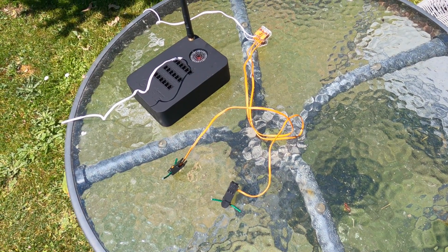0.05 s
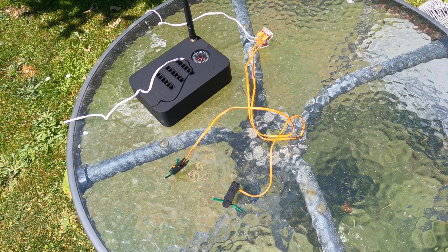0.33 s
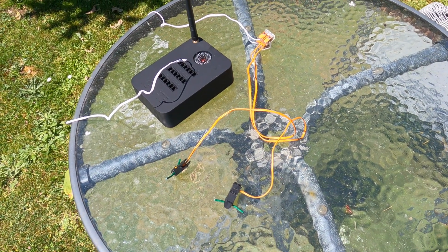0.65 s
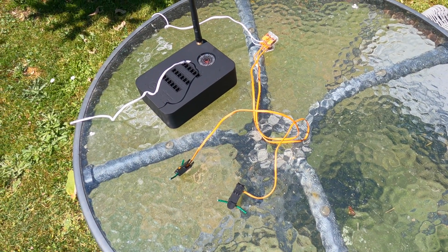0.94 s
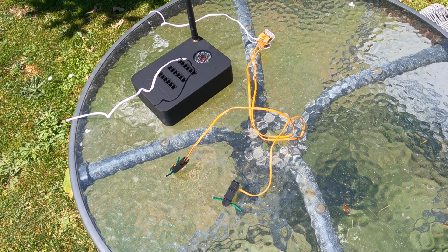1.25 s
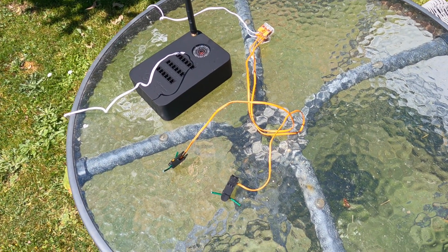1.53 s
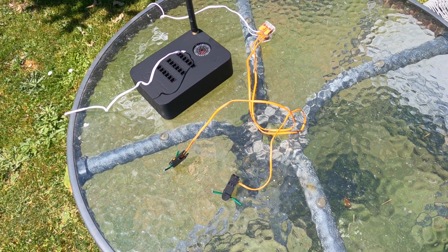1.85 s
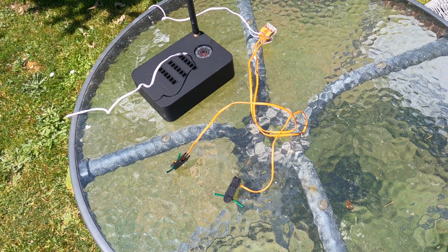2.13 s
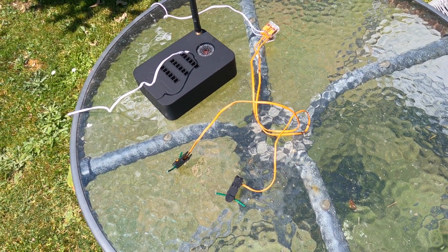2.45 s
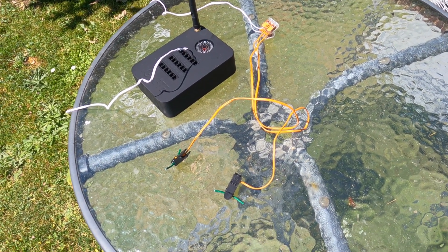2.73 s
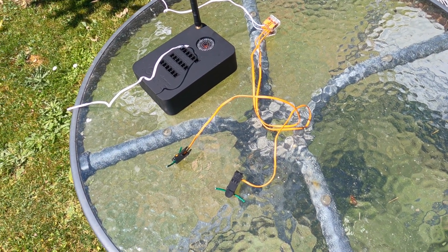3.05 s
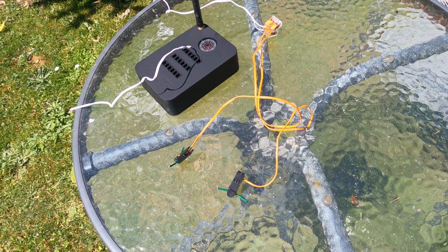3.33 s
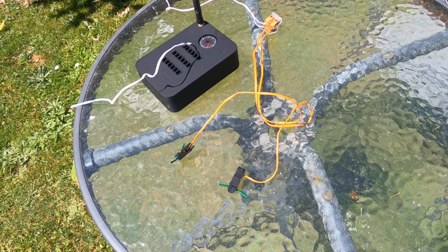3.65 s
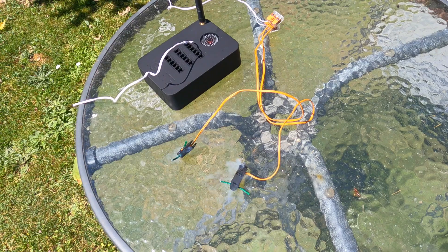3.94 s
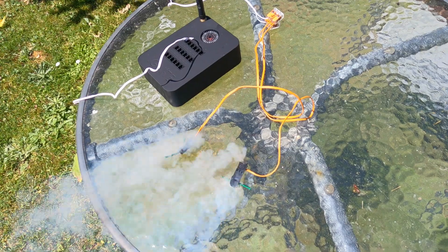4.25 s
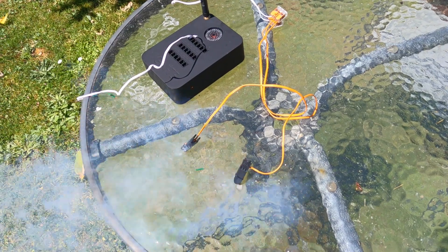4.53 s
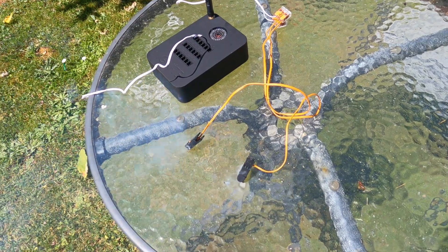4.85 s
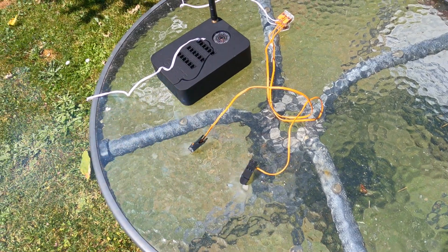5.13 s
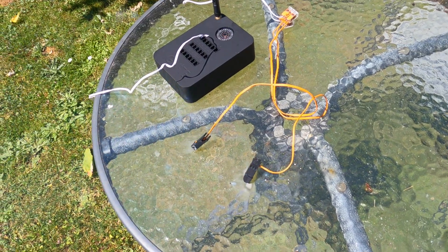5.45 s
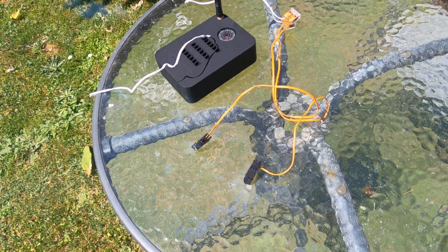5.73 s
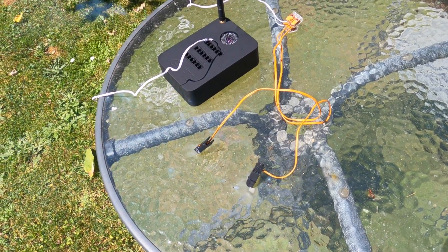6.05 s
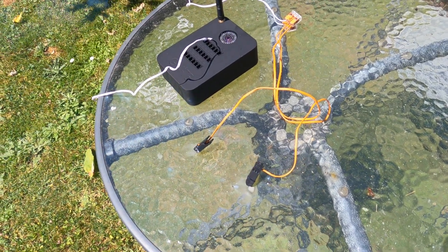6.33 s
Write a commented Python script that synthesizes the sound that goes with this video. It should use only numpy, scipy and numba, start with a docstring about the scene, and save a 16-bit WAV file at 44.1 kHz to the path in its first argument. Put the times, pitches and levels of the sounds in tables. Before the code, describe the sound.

Songbirds whistle and chatter in the trees over faint far traffic and a low machine hum. Close to the hand-held microphone, a small igniter bursts into a hissing jet, and a second joins it half a second later with a few short spits. They sputter, die down to a thin fizzing and stop abruptly about two seconds after lighting. Wind gusts buffet the microphone, and soft chirps return.

```python
"""Two firework igniters burn on a glass garden table, close to a hand-held phone.
Rushing gas and popping grains make the sound: the first flares into a hissing jet, the second joins
with a broader roar, then a thin fizz lingers and cuts out. Songbirds whistle, chirp and rattle in the
trees, with faint calls and rustles behind them. A breeze rumbles on the microphone over far traffic
and the hum of a distant machine."""
import sys
import numpy as np
from scipy import signal
from scipy.fft import rfft, irfft
from scipy.io import wavfile
from scipy.ndimage import uniform_filter1d
from numba import njit

SR = 44100
rng = np.random.default_rng(int(sys.argv[2]) if len(sys.argv) > 2 else 0)


def store_pcm(level_fs):
    """Save levels as 16-bit WAV."""
    pcm = np.round(np.clip(level_fs, -1, 1) * 32767).astype(np.int16)
    wavfile.write(sys.argv[1], SR, np.atleast_2d(pcm).T)


N = 290619
TIME = np.arange(N) / SR

# How the flame changes as it burns down. Each row: time in seconds, stage (0 flare, 1 blaze, 2 embers,
# 3 last fizz), left minus right in dB, stereo width in dB.
BURN_STAGES = [(4.36, 0, -1, -3), (4.6, 1, 0.5, -8.5), (4.84, 1, 1.5, -3), (4.95, 2.5, 3, -9),
               (5.3, 2.5, 3, -1), (5.5, 3, 2.5, 5)]
# How a small bird's windpipe and beak filter its voice. Each row: frequency in Hz, gain in dB.
BEAK_FILTER = [(1500, -14), (2400, -5), (3100, -0.5), (5000, -1.5), (6900, -5.5), (7700, -23), (9000, -18)]


def igniters(surge_db=0.9, glass_db=-12.5, garden_db=-21, top_side_db=-2, top_hz=12800):
    """The flames surge; the glass throws the hiss straight back and the garden echoes faintly."""
    # How much the hiss differs between the ears. Each row: frequency in Hz, gain in dB.
    spread = [(200, -13.5), (600, -11.5), (1200, -22), (1900, -21), (2400, -10), (3400, -9.5),
              (4200, -24.5), (6800, -21), (10500, -25.5)]
    _, pan_db, side_db = curves(BURN_STAGES)
    direct = flame() * undb(surge_db * walk(40)) + spits()
    glass_echo = undb(glass_db) * scatter(direct, t60=0.057, delay_s=.001)
    garden_echo = undb(garden_db) * scatter(direct, t60=0.35, delay_s=0.015)
    wide = flame()
    side = colour(wide, spread) * undb(side_db) + undb(top_side_db) * band(wide, top_hz, SR / 2)
    return stereo(direct + glass_echo + garden_echo, side, pan_db)


def flame(flutter_db=0.55, flutter_rate=110):
    """The jet changes tone as the charge burns away, and the emptied casings ring with it."""
    # The jet's tone in each of the four stages. Each row: frequency in Hz, gain in dB.
    flare = [(400, -11), (1000, -4), (2800, -4.5), (3900, -1), (6100, -1.5), (7100, -6.5), (7600, -10.5),
             (8800, -10), (11000, -11.5), (12100, -10), (13200, -14), (15700, -23)]
    blaze = [(120, -5), (350, -6.5), (1000, -2.5), (1900, -1), (5200, -2.5), (6900, -3), (8000, -8),
             (11000, -15.5), (12100, -16), (13500, -20.5), (15700, -44)]
    embers = [(120, 0), (600, -6), (4000, -4), (7200, 1), (8100, -7), (10500, -16), (12200, -17),
              (15700, -31)]
    last_fizz = [(120, 1), (750, -8.5), (1200, -1.5), (2500, 1.5), (7400, 2.5), (8200, -4), (10200, -11.5),
                 (12200, -12), (15700, -29)]
    # Where the spent casings ring. Each row: frequency in Hz, width in Hz, gain in dB.
    casing_rings = [(1260, 120, -2), (1865, 190, -6), (6150, 39, -2), (6800, 110, -7)]
    # The burning channel rings higher as the embers run out.
    # Each row: time in seconds, frequency in Hz, share added.
    channel_ring = [(4.6, 1500, 0.067), (5.0, 1500, 0.52), (5.3, 2700, 0.32), (5.46, 4970, 0.93),
                    (5.7, 7000, 0)]
    # A shifting dip in the treble. Each row: time in seconds, frequency in Hz, depth from 0 to 1.
    treble_dip = [(3.92, 7450, .9), (4.15, 8200, 0), (4.4, 6900, 0.54), (4.6, 7950, 0.2)]
    stage = curves(BURN_STAGES)[0]
    gas = jet()
    hiss = sum(np.clip(1 - abs(stage - k), 0, 1) * unit(colour(gas, spectrum))  # stages blend
               for k, spectrum in enumerate([flare, blaze, embers, last_fizz]))
    emptied = np.clip(stage / 3, 0, 1)
    hiss = hiss + emptied * sum(undb(db) * resonate(hiss, hz, width) for hz, width, db in casing_rings)
    channel_hz, share = curves(channel_ring)
    dip_hz, depth = curves(treble_dip)
    hiss = hiss + share * sweep(hiss, channel_hz, 1500.) - depth * sweep(hiss, dip_hz, 1700.)
    # Large swirls of gas roar, small ones fizz; each size flutters on its own.
    roar, fizz = band(hiss, 60, 1300), band(hiss, 7800, 19000)
    out = 0
    for swirls, level in zip((roar, hiss - roar - fizz, fizz), burn_levels()):
        steady = swirls / np.sqrt(uniform_filter1d(swirls ** 2, size=3000) + 1e-12)
        out = out + steady * level * undb(flutter_db * walk(flutter_rate))
    return out


def jet(sparks_per_s=2500, spark_spread_db=2, spark_db=-10):
    """Rushing gas mixed with the tiny pops of burning grains."""
    pops = (rng.random(N) < sparks_per_s / SR) * np.sign(noise())
    strength = undb(spark_spread_db * rng.exponential(size=N).clip(0, 4))
    return unit(noise() + undb(spark_db) * unit(pops * strength))


def burn_levels(roar_build_s=0.13):
    """Each flame catches, holds, wanes and dies; together they set the level of roar, hiss and fizz."""
    # The flames: first jet, second jet, its surge, a sputter, embers, a flare-up, last fizz.
    # Each row: start, rise and hold in seconds, waning in dB per second, going-out time and fade in
    # seconds, hiss level in dB, roar and fizz in dB above the hiss, fizz change in dB per second.
    flames = [(3.9, 0.1, 0.19, 14, 4.42, 0.061, -26.6, -11, -15.5, 8),
              (4.412, .025, 0.2, 34, 4.83, 0.065, -26.2, -10.5, -9.5, -8),
              (4.455, .03, .02, 8, 4.622, .02, -27.3, -8, -7.5, 0),
              (4.812, 0.027, .02, 58, 4.868, 0.049, -37.6, -8, -3.5, -10),
              (4.85, 0.029, 0.26, 22, 6.1, 0.027, -42.1, -9, -10.5, 3),
              (5.15, 0.07, .03, 30, 5.42, .04, -42.6, -24, -11, 9),
              (4.803, 0.099, 0.66, 0, 6.172, .025, -51.2, -2.5, -7, -1)]
    power = 0
    for start, rise, hold, wane, out_s, fade, db, roar_db, fizz_db, brightening in flames:
        age = np.maximum(TIME - start, 0)
        level = np.minimum(age / rise, 1) * undb(db - wane * np.maximum(age - rise - hold, 0))
        level = level * np.exp(-np.maximum(TIME - out_s, 0) / fade)
        power += np.array([level * undb(roar_db), level, level * undb(fizz_db + brightening * age)]) ** 2
    roar, hiss, fizz = np.sqrt(power)
    since_lit = np.maximum(TIME - flames[0][0], 0)
    return roar * (1 - np.exp(-since_lit / roar_build_s)), hiss, fizz  # large swirls form slowly


def spits(rise_s=.003, fall_s=0.011):
    """Lumps of the charge go off in short puffs."""
    # Each row: start in seconds, centre in Hz, width in Hz, level in dB.
    puffs = [(3.912, 13000, 3500, -48), (4.3, 1710, 1500, -28), (4.521, 12000, 2210, -34),
             (4.595, 11500, 3500, -35), (4.808, 700, 900, -31.5)]
    out = np.zeros(N)
    t = np.arange(SR // 10) / SR
    puff = np.minimum(t / rise_s, 1) * np.exp(-np.maximum(t - rise_s, 0) / fall_s)
    for s, hz, width, db in puffs:
        add(out, s, undb(db) * puff * ringing_noise(hz, width, len(t)))
    return out


def birds():
    """The whistler sits in the open, the chattering sparrows deeper in the trees."""
    return (among_leaves(whistles(), pan_db=12, leaves_db=-8, echo_db=-14.5, t60=0.55)
            + among_leaves(colour(chirps(), BEAK_FILTER), pan_db=6, leaves_db=-6.5, echo_db=-11.5, t60=.5)
            + among_leaves(rattle(), pan_db=7.5, leaves_db=-10, echo_db=-13, t60=.45))


def whistles(start_ratio=1.19, waver=0.0086, drift=0.007, onset_rasp=.025, rasp_db=-13, flicker_db=2):
    """Both sides of a bird's voice box slide down in pitch; each note starts hoarse and stays husky."""
    # Each row: start in seconds, relative level in dB, upper voice boost in dB, lower voice delay in
    # seconds, final pitch ratio of the two voices.
    notes = [(0.718, -55.5, 0, 0.0034, 1.2), (0.985, -53, 2.5, 0, 1.18), (1.272, -50.5, 5, 0.021, 1.07),
             (1.492, -49, 5.5, 0.012, 1.13), (1.778, -50, 3, 0.0056, 1.1), (2.018, -57, 10.5, 0.0072, 1.1),
             (2.339, -53, 6, 0.00091, 1.12), (2.787, -47, -3.5, 0.0017, 1.4),
             (3.464, -50.5, 1, 0.0066, 1.1), (3.85, -49, 0.5, 0.002, 1.1)]
    # One whistle's shape. Each row: age in seconds, lower pitch in Hz, lower and upper voice gain in dB.
    slide = [(0, 3845, -17, -11), (.02, 3450, -4, -9.5), (.04, 3110, -6.5, -6), (.072, 2970, 5.5, -7.5),
             (.092, 2800, -0.5, -12.5), (.112, 2596, -10, -24)]
    out = np.zeros(N)
    size = int(slide[-1][0] * SR)
    t = np.arange(size) / SR
    hz, lower_db, upper_db = curves(slide, t)
    fade = signal.windows.tukey(size, .15)
    for s, db, boost_db, late_s, end_ratio in notes:
        hoarse = onset_rasp * np.exp(-t / .025) * walk(700, size)
        pitch = hz * (1 + hoarse + waver * walk(250, size) + drift * walk(45, size))
        ratio = start_ratio + (end_ratio - start_ratio) * (t / t[-1]) ** 2
        lower_level = undb(lower_db) * np.clip((t - late_s) / 0.0034, 0, 1)
        for voice_hz, level in ((pitch, lower_level), (pitch * ratio, undb(upper_db + boost_db))):
            voice = tone(voice_hz) * (1 + undb(rasp_db) * walk(1100, size))
            add(out, s, undb(db - 2.5 + flicker_db * walk(114, size)) * level * voice * fade)
    return out


def chirps(tremble=0.027, warble=.15, warble_hz=80, rasp_db=-9, hiss_db=-13):
    """Sparrows sing quick pitch arcs; a rough one zigzags and frays into a rasp."""
    # Each row: start and length in seconds, first, middle and last pitch in Hz, level in dB,
    # roughness from 0 to about 1.
    notes = [(0.126, .06, 4300, 4900, 5100, -56, 0.6), (0.237, 0.033, 3200, 3650, 4200, -56, 0.28),
             (.44, .09, 3700, 3570, 3130, -64, 0.24), (0.867, 0.062, 3800, 5130, 4500, -68.5, 0.55),
             (1.335, 0.062, 4500, 4770, 4700, -59, 0.94), (1.587, 0.058, 3320, 5000, 4660, -59.5, 0.7),
             (1.625, .052, 3580, 4800, 5400, -56.5, 0.7), (1.652, 0.053, 3270, 3990, 3700, -54.5, .7),
             (1.725, 0.054, 2900, 3470, 4340, -56, 0.5), (2.003, 0.042, 4115, 4610, 3700, -50.5, 0.43),
             (2.044, 0.058, 4340, 3910, 3430, -51, 0.77), (2.128, 0.043, 4600, 4450, 3400, -55, 0.7),
             (2.168, 0.077, 3340, 3330, 3120, -54, 0.6), (2.365, .055, 4700, 5120, 4850, -64, .3),
             (2.456, 0.078, 3600, 3960, 3780, -55, 0.77), (2.854, 0.098, 4210, 3800, 3230, -52.5, 1.02),
             (2.987, 0.035, 3490, 4090, 3720, -48.5, 0.9), (3.068, .052, 4650, 4970, 5780, -54.5, 0.54),
             (3.079, 0.0336, 3100, 3770, 3200, -54, 0.67), (3.11, 0.025, 4450, 3520, 3060, -58, 0.4),
             (3.164, 0.033, 3230, 3510, 4220, -51, 0.65), (3.263, 0.063, 4350, 4610, 4620, -50.5, 0.62),
             (3.313, 0.096, 4190, 3790, 3400, -52, 0.86), (3.455, 0.032, 3490, 3860, 3700, -53.5, 0.88),
             (6.362, 0.062, 3950, 5040, 5670, -64, 0.35), (6.411, .028, 4100, 3400, 3000, -66, 0.1),
             (6.438, 0.073, 4900, 5120, 5050, -66, 0.54), (6.462, .045, 2900, 3620, 3900, -62, 0.4)]
    out = np.zeros(N)
    hiss = unit(resonate(band(noise(), 2400, 8500), 3400, 2200))
    for s, length, first, middle, last, db, rough in notes:
        size = int(length * SR)
        arc_hz = np.polyval(np.polyfit([0, .5, 1], [first, middle, last], 2), np.linspace(0, 1, size))
        cycles = np.cumsum(warble_hz * (1 + 0.305 * walk(60.2, size))) / SR + rng.random()
        zigzag = signal.sawtooth(2 * np.pi * cycles, 1 / 3)
        voice = tone(arc_hz * (1 + warble * rough ** 2 * zigzag + tremble * rough * walk(600, size)))
        rasp = undb(rasp_db) * voice * walk(1200, size)
        rasp += undb(hiss_db) * np.roll(hiss, -int(s * SR))[:size]
        note = (voice + 2 * rough * rasp) * undb(1.6 * rough * walk(228, size))
        add(out, s, undb(db) * unit(note * signal.windows.tukey(size, .45)))
    return out


def rattle(rise_s=0.0048, fall_s=0.01, lead_s=0.0053, gain_db=-7, scratch_db=-9.5, grain_db=1.5):
    """A bird scolds: harsh bursts ring at two pitches in its throat, over a grainy scratch."""
    # Each row: time in seconds, relative level in dB, boost of the upper ring in dB.
    notes = [(0.02, -43.5, -6), (0.0672, -43.5, -3), (0.1176, -41, -6), (0.174, -45, -2),
             (0.2174, -43, -0.5), (0.2663, -42, -6), (0.315, -41.5, -1), (0.375, -42.5, -2),
             (3.5854, -63, 10), (3.6277, -51, 4), (3.669, -48, 4.5), (3.7155, -50, 6), (3.7718, -48, 4.5),
             (3.8312, -47.5, -2)]
    # The tone of the scratch. Each row: frequency in Hz, gain in dB.
    scratch_tone = [(700, -19), (1600, -1.5), (6500, 1.5), (8200, -15.5), (15000, -28)]
    low, high = np.zeros(N), np.zeros(N)
    t = np.arange(SR // 10) / SR
    burst = np.minimum(t / rise_s, 1) * np.exp(-np.maximum(t - 3 * rise_s, 0) / fall_s)
    for s, db, upper_db in notes:
        add(low, s - lead_s, undb(db) * burst)
        add(high, s - lead_s, undb(db + upper_db) * burst)
    voice = colour(low * ringing_noise(3700, 2040) + high * ringing_noise(6000, 1300), BEAK_FILTER)
    grainy_gain = undb(gain_db + grain_db * walk(600))
    return grainy_gain * (voice + undb(scratch_db) * low * unit(colour(noise(), scratch_tone)))


def among_leaves(song, pan_db, leaves_db, echo_db, t60, side_db=-7):
    """A bird's song is scattered by the leaves round it and echoed by the garden."""
    mid, side = (undb(leaves_db) * scatter(song, t60=0.21, delay_s=0.0012)
                 + undb(echo_db) * scatter(song, t60, delay_s=0.026) for _ in range(2))
    side += undb(side_db) * scatter(song, t60=0.017, delay_s=0)
    return undb(-2) * stereo(song, pan_db=pan_db) + stereo(mid, side)


def far_calls(blur=0.12, side_db=-8, faint_per_s=2, faint_hz=814, faint_s=0.082, faint_db=-68.5):
    """Short distant calls, blurred in pitch; the fainter ones come at random."""
    # Each row: start in seconds, length in seconds, pitch in Hz, relative level in dB.
    nearer = [(0.184, 0.098, 726, -59.5), (.64, 0.11, 1097, -66), (1.111, 0.07, 700, -61.5),
              (1.159, 0.071, 534, -61.5), (1.41, 0.044, 1687, -59.5), (1.7, 0.071, 761, -60),
              (2.05, 0.045, 994, -62), (2.635, .05, 918, -63.5), (3.215, 0.052, 645, -61.5),
              (3.625, 0.059, 828, -61), (6.48, 0.053, 1290, -59.5)]
    faint = [(when * N / SR, faint_s, faint_hz * 2 ** (0.8 * (2 * height - 1)), faint_db)
             for when, height in rng.random((int(faint_per_s * N / SR), 2))]
    out = np.zeros(N)
    for s, length, hz, db in nearer + faint:
        size = int(length * SR)
        swell = unit(np.sin(np.linspace(0, np.pi, size)))
        add(out, s, undb(db) * swell * tone(hz * (1 + blur * walk(258.3, size))))
    mid_echo, side_echo = (scatter(out, t60=0.3, delay_s=0.0034) for _ in range(2))
    return stereo(undb(-1.5) * out + undb(-5) * mid_echo, undb(side_db) * side_echo)


def rustles(grain_db=3):
    """Thin grainy hisses swell and fade."""
    # Each row: peak time in seconds, length in seconds, level in dB.
    swells = [(3.048, 0.053, -64.5), (3.826, 0.2, -66.5)]
    # Their tone. Each row: frequency in Hz, gain in dB.
    rustle_tone = [(3500, -11), (6000, 3.5), (7600, -4), (8600, -11), (12300, -16), (15000, -30)]
    level = sum(undb(db) * hump(s, length) for s, length, db in swells)
    return stereo(level * unit(colour(noise() * undb(grain_db * walk(330)), rustle_tone)))


def breeze(side_db=-15, pan_db=-3.7, flutter_db=1.5, swirl_db=-32, swirl_growth=0.48):
    """Light wind and gusts rumble on the microphone, more on the right; small swirls flap above them."""
    # The light wind. Each row: time in seconds, level in dB.
    light_wind = [(0, -47.5), (.5, -52), (.9, -45.5), (3.7, -47), (4.1, -52.5), (4.6, -47.5), (5.4, -43),
                  (6.59, -41.5)]
    # Each row: peak time in seconds, length in seconds, rumble level in dB, flapping level in dB.
    gusts = [(1.471, 0.087, -34.5, -45.5), (2.313, 0.059, -33.5, -50), (2.59, 0.25, -41.5, -53),
             (2.888, 0.14, -33, -63), (3.193, 0.1, -36.5, -60), (3.366, 0.1, -38, -64),
             (3.637, 0.19, -37, -56), (5.07, 0.34, -40, -54), (5.205, 0.074, -29.5, -36.5),
             (5.534, 0.31, -31, -43.5), (6.031, 0.31, -32, -44.5), (6.487, 0.056, -33.5, -55)]
    # The tones of the rumble and the flapping. Each row: frequency in Hz, gain in dB.
    rumble_tone = [(10, -6.5), (22, -2), (40, 2), (58, -6), (78, -6.5), (100, -21), (400, -84),
                   (2000, -110)]
    flap_tone = [(60, -17), (95, 5), (125, -4.5), (160, -11.5), (300, -24.5), (800, -58), (6000, -100)]
    wind_db, = curves(light_wind)
    rumble, flap = undb(wind_db), undb(swirl_db + swirl_growth * wind_db)
    for s, length, rumble_db, flap_db in gusts:
        rumble = np.hypot(rumble, undb(rumble_db) * hump(s, length))
        flap = np.hypot(flap, undb(flap_db) * hump(s, length))
    out = 0
    for level, spectrum in ((rumble, rumble_tone), (flap, flap_tone)):
        mid, side = (unit(colour(noise(), spectrum)) for _ in range(2))
        steady = mid / np.sqrt(uniform_filter1d(mid ** 2, size=3500) + 1e-9)
        out = out + stereo(steady, undb(side_db) * side, pan_db) * level
    return out * undb(flutter_db * walk(28))


def garden(side_db=-4.5, pan_db=2, patchy_db=3, patchy_rate=14):
    """Far traffic comes and goes band by band under smooth leaf hiss, with a wavering machine hum."""
    # The tone of the garden air. Each row: frequency in Hz, gain in dB.
    air_tone = [(60, 9.5), (170, 15), (280, 1.5), (500, -1.5), (850, -7), (1050, 1), (1650, -5),
                (2200, -11.5), (4000, -10), (7600, -19), (8400, -27), (12200, -39.5), (14000, -51.5)]
    # Its level as traffic comes and goes. Each row: time in seconds, level in dB.
    air_level = [(0, -56.5), (2.1, -56.5), (2.6, -58.5), (3.7, -57.5)]
    # The distant machine. Each row: pitch in Hz, level in dB.
    hum_tones = [(41, -52), (119, -62.5), (190, -66)]
    mid, side = (unit(colour(noise(), air_tone)) for _ in range(2))
    side = colour(side, [(100, -3.5), (350, 0.5)])  # long waves reach both ears more alike
    air = stereo(mid, undb(side_db) * side, pan_db)
    edges_hz = np.geomspace(400, 2000, 8)
    patches = sum(band(air, lo, hi) * (undb(patchy_db * walk(patchy_rate)) - 1)
                  for lo, hi in zip(edges_hz, edges_hz[1:]))
    hum = sum(undb(db + 2.7 * walk(4.12)) * tone(hz * (1 + 0.02023 * walk(12))) for hz, db in hum_tones)
    return (air + patches) * undb(curves(air_level)[0]) + stereo(hum)


def undb(db):
    """Turn decibels into a gain."""
    return 10 ** (np.asarray(db) / 20)


def unit(x):
    """Scale to an average power of 1."""
    return x / np.sqrt(np.mean(x ** 2) + 1e-20)


def curves(table, t=TIME):
    """Join each column's values with straight lines in time."""
    s, *columns = np.transpose(table)
    return [np.interp(t, s, c) for c in columns]


def hump(peak_s, length_s):
    """A bell-shaped swell and fade."""
    return np.exp(-((TIME - peak_s) / (length_s / 2)) ** 2)


def colour(x, points):
    """Shape a sound's tone with (Hz, dB) points."""
    hz, db = np.transpose(points)
    f = np.fft.rfftfreq(N, 1 / SR) + 1
    return irfft(rfft(x) * undb(np.interp(np.log(f), np.log(hz), db)), N)


def band(x, lo_hz, hi_hz):
    """Keep what lies between two frequencies."""
    sos = signal.butter(3, [lo_hz, min(hi_hz, .45 * SR)], "band", fs=SR, output="sos")
    return signal.sosfiltfilt(sos, x)


def resonate(x, hz, width_hz):
    """Ring at one frequency, with gain 1 there."""
    return signal.lfilter(*signal.iirpeak(hz, hz / width_hz, fs=SR), x)


@njit
def sweep(x, hz, width_hz):
    """Ring at a moving frequency, with gain 1 there."""
    out, band_state, low_state = np.empty(len(x)), 0., 0.
    for i in range(len(x)):
        tuning, damping = np.tan(np.pi * hz[i] / SR), width_hz / hz[i]
        ring = (band_state + tuning * (x[i] - low_state)) / (1 + tuning * (tuning + damping))
        band_state, low_state = 2 * ring - band_state, low_state + 2 * tuning * ring
        out[i] = damping * ring
    return out


def noise(size=N):
    """White noise."""
    return rng.standard_normal(size)


def ringing_noise(hz, width_hz, size=N):
    """Noise gathered round one frequency."""
    return unit(resonate(resonate(noise(size), hz, width_hz), hz, width_hz))


def walk(rate, size=N):
    """Random drift of spread 1 that turns rate times a second."""
    at = np.arange(size) * rate / SR
    return np.interp(at, np.arange(size), noise(size)) * np.sqrt(3 / 2)


def tone(hz):
    """A sine that follows a pitch curve."""
    return np.sqrt(2) * np.sin(2 * np.pi * np.cumsum(hz) / SR)


def add(track, s, x):
    """Mix a sound into a track at s seconds."""
    i = max(int(s * SR), 0)
    track[i:i + len(x)] += x[:max(N - i, 0)]


def stereo(mid, side=0, pan_db=0):
    """Left and right from what they share (mid) and what differs (side); positive pan is left."""
    return np.array([(mid + side) * undb(pan_db / 2), (mid - side) * undb(-pan_db / 2)])


def scatter(x, t60, delay_s):
    """A wash of echoes that fades by 60 dB in t60 seconds."""
    t = np.arange(SR) / SR
    tail = noise(SR) * np.exp(-np.log(1000) * t / t60) * (t > delay_s)
    return signal.fftconvolve(x, unit(tail) / np.sqrt(SR))[:N]


def scene():
    """Everything that reaches the microphone."""
    return igniters() + birds() + far_calls() + rustles() + breeze() + garden()


def record(dry):
    """The phone dulls its left side, rounds the highest peaks and cuts the top treble."""
    # The duller left microphone. Each row: frequency in Hz, gain in dB.
    left_mic = [(12200, 0), (13200, -7), (14200, -11), (15700, -5)]
    ceiling, top_hz = .4, 15550
    mics = np.array([colour(dry[0], left_mic), dry[1]])
    rounded = ceiling * np.tanh(mics / ceiling)
    return signal.sosfilt(signal.ellip(10, .2, 80, top_hz, fs=SR, output="sos"), rounded)


dry = scene()
out = record(dry)
store_pcm(out)
```